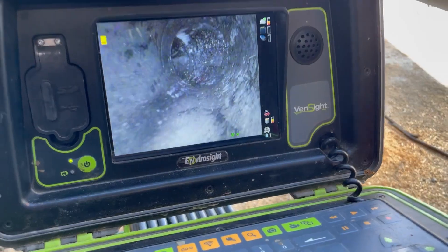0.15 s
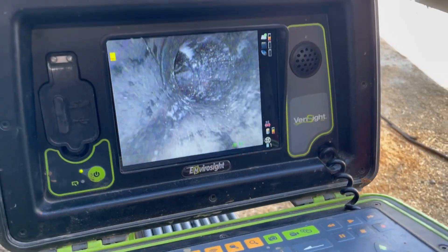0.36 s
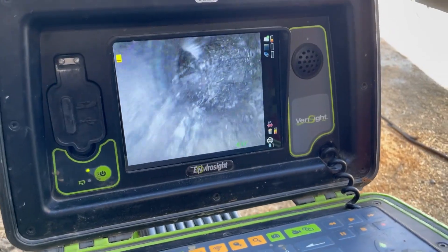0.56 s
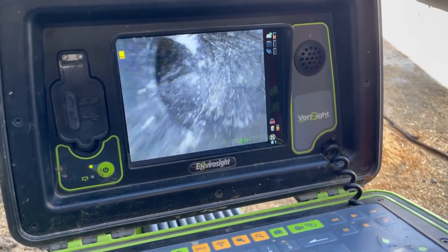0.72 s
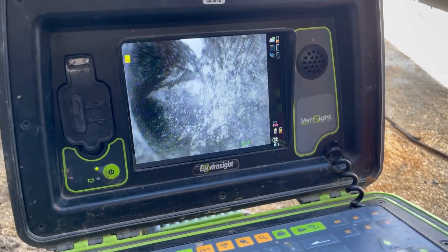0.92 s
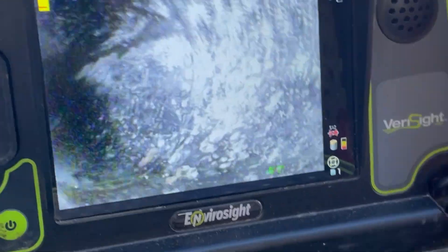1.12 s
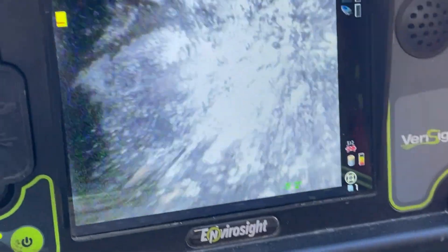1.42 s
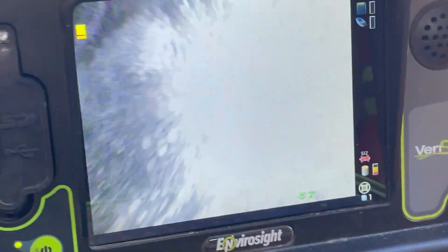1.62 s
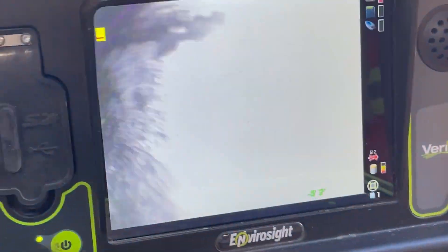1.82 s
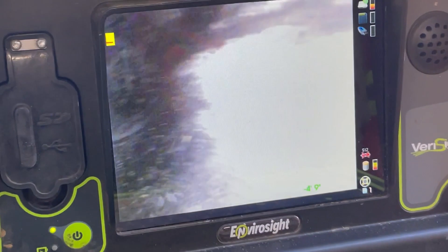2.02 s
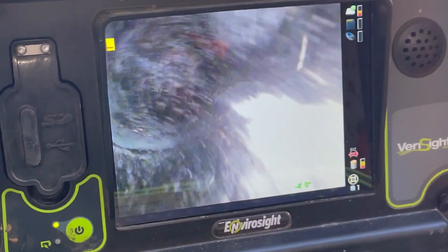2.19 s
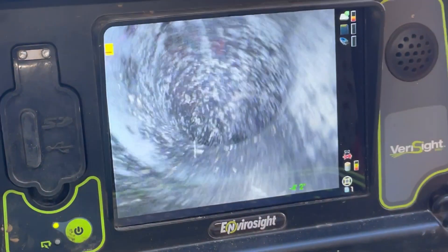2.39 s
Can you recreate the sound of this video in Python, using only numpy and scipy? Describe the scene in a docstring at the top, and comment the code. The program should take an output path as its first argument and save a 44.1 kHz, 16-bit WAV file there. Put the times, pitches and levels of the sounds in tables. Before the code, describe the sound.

A vacuum truck runs throughout, its pump buzzing in rapid pulses with a strong low hum over engine throb, airy roar and faint wavering whines. Dull thumps fall near 0.1, 0.3, 0.7, 1.3 and 1.9 seconds. Thin squeaks come early and around 1.7, short scrapes at 1.5 and 1.7. Light hiss swells near 0.9, 1.7 and the end. Outdoors, the microphone moves closer to a case after 0.7, narrowing the roar.

```python
"""Vacuum truck at work

A vacuum truck runs outdoors: its pump throbs and hums in pulses through a pipe, over the low orders of the engine.
Shaped noise makes the roar of air and a thin hiss that swells now and then; the drive whines in wavering tones.
Decaying sines make dull thumps, sagging sines thin squeaks, and resonant noise short scrapes.
The microphone moves close to an open equipment case, which colours and narrows the roar."""
import sys
import numpy as np
from scipy import signal
from scipy.fft import rfft, irfft
from scipy.io import wavfile
from scipy.ndimage import uniform_filter1d

SR = 44100
rng = np.random.default_rng(int(sys.argv[2]) if len(sys.argv) > 2 else 0)


def transcribe(u):
    """Save the signal u as a 16-bit wav file named by the first command-line argument.

    u: samples, shape (n,) or (channels, n), limited to [-1, 1]; the rate is SR.
    q: integer samples, one column per channel.
    """
    v = np.clip(np.atleast_2d(u).T, -1, 1)
    q = np.round(v * 32767).astype(np.int16)
    wavfile.write(sys.argv[1], SR, q)


N = 112454
T = np.arange(N) / SR
PUMP_HZ = 43.655  # mean strokes a second


def amp(db):
    """Decibels to gain."""
    return 10 ** (np.asarray(db) / 20)


def unit(x):
    """Scales to rms 1."""
    return x / np.sqrt(np.mean(x ** 2) + 1e-20)


def curve(points, at):
    """Reads a level curve, straight between its points."""
    return np.interp(at, *np.transpose(points))


def read(points, hz):
    """Reads a spectrum on a log-frequency axis."""
    f, value = np.transpose(points)
    return np.interp(np.log(hz + 1), np.log(f + 1), value)


def drift(rate_hz):
    """Smooth random motion of rms 1: noise with its faster changes rolled off."""
    f = np.fft.rfftfreq(2 * N, 1 / SR)
    spectrum = rfft(rng.standard_normal(2 * N))
    return unit(irfft(spectrum * np.exp(-(f / rate_hz) ** 2))[:N])


def band(x, low_hz, high_hz):
    """One frequency band of a sound, rms 1."""
    f = np.fft.rfftfreq(2 * N, 1 / SR)
    inside = (f >= low_hz) & (f < high_hz)
    return unit(irfft(rfft(x, 2 * N) * inside)[:N])


def grid(size):
    """Frame times as a column and bin frequencies as a row."""
    hop = size // 4
    t = np.arange(N // hop + 5)[:, None] * hop / SR
    return t, np.fft.rfftfreq(size, 1 / SR)


def speckle(t, hz):
    """Random short-time spectra, the raw stuff of noise."""
    z = rng.standard_normal((len(t), len(hz), 2))
    return z[..., 0] + 1j * z[..., 1]


def patches(t, hz, length_s, width_hz):
    """Random patches over time and frequency, rms 1."""
    z = rng.standard_normal((len(t), len(hz)))
    z = uniform_filter1d(z, max(1, round(length_s / t[1, 0])), 0)
    z = uniform_filter1d(z, max(1, round(width_hz / hz[1])), 1)
    return unit(z)


def sound_of(z):
    """Short-time spectra to sound; magnitude 1 gives 0 dB per Hz."""
    size = 2 * (z.shape[1] - 1)
    sound = signal.istft(z.T, nperseg=size, noverlap=size * 3 // 4)[1][:N]
    return sound * np.sqrt(1.5 * SR / size)


def pipe_ring():
    """One pressure pulse coloured by the pipe, whose higher overtones arrive later."""
    # Pipe response. Each row: multiple of the stroke rate, relative level in dB.
    pipe_response = [(1, -13), (2, -36), (3, -10.5), (4, -10), (5, -4.5), (6, -11.5), (7, 2), (8, -15.5),
                     (9, -11), (10, -19.5), (11, -19.5), (12, -13), (13, -42), (14, -25), (15, -24),
                     (16, -22), (18, -38.5)]
    spread_s_per_hz = .000028
    order, db = np.transpose(pipe_response)
    f = np.fft.rfftfreq(8192, 1 / SR)
    multiple = f / PUMP_HZ
    level = np.interp(multiple, order, db)
    level -= 4 * np.maximum(multiple - order[-1], 0)  # falls away above the last row
    level -= 30 * np.maximum(1 - multiple, 0)  # and below the stroke rate
    return np.fft.fftshift(irfft(amp(level) * np.exp(-1j * np.pi * spread_s_per_hz * f ** 2)))


def pump(turns):
    """One pressure pulse per stroke through the pipe, split into throb, main hum and overtones."""
    # Main hum. Each row: time in seconds, level in dB before hum_gain_db.
    hum_level = [(.05, -26.5), (.2, -25), (.26, -22.5), (.42, -23.2), (.55, -26), (1.1, -25.5),
                 (1.21, -24.5), (1.3, -26), (1.55, -27), (1.72, -22.5), (1.84, -25.5), (1.95, -24.5),
                 (2.08, -27), (2.37, -23), (2.52, -30)]
    # Throb below the hum. Each row: time in seconds, level in dB before throb_gain_db.
    throb_level = [(.08, -30), (.18, -25), (.33, -24.5), (.43, -27), (.54, -24.5), (.75, -32), (.92, -31.5),
                   (1.05, -29), (1.25, -26), (1.5, -35), (1.65, -25.5), (1.75, -25), (1.87, -28),
                   (2.12, -28.5), (2.25, -25.5), (2.4, -29), (2.53, -35)]
    hum_gain_db, throb_gain_db = -0.16, -0.2
    overtones_db, overtones_waver_db = -33.5, 2.5
    hum_from_hz, hum_to_hz = 283, 327
    stroke_spread_db, stroke_jitter_s = 0.48, .00008

    at = np.flatnonzero(np.diff(np.floor(turns)))
    jitter, spread = rng.standard_normal((2, len(at)))
    at = at + np.round(stroke_jitter_s * SR * jitter).astype(int)
    strokes = np.zeros(N)
    strokes[np.clip(at, 0, N - 1)] = amp(stroke_spread_db * spread)
    pulses = signal.oaconvolve(strokes, pipe_ring(), "same")

    throb = band(pulses, 0, hum_from_hz) * amp(throb_gain_db + curve(throb_level, T))
    hum = band(pulses, hum_from_hz, hum_to_hz) * amp(hum_gain_db + curve(hum_level, T))
    overtones = band(pulses, hum_to_hz, SR / 2) * amp(overtones_db + overtones_waver_db * drift(7.6))
    return (throb + hum + overtones) * amp([[.2], [-.2]])  # a touch to the left


def engine():
    """Low engine orders, the firing rate strongest, that line up in one soft beat per cycle."""
    # Engine throb. Each row: time in seconds, gain in dB on all orders.
    throb_gain = [(.05, -5), (.5, 0), (.75, .8), (.88, -1.5), (1.2, 1), (1.55, 2), (1.8, -5), (2.08, 1.2),
                  (2.3, -4.5), (2.5, 3)]
    # Engine orders. Each row: multiple of the cycle rate, level in dB before the gain above.
    orders = [(3, -41.5), (4, -31.5), (5, -36)]
    cycle_hz, wander = 14.97, 0.0012  # four-stroke cycles a second, rms share
    first_beat_s = 0.0459
    turns = np.cumsum(cycle_hz * (1 + wander * drift(2.4))) / SR - cycle_hz * first_beat_s
    tones = sum(amp(db) * np.sqrt(2) * np.cos(2 * np.pi * k * turns) for k, db in orders)
    return amp(curve(throb_gain, T)) * tones * amp([[.2], [-.2]])  # a touch to the left


def whines():
    """Faint tones of the drive that waver at random in level and phase."""
    # Whines of the drive. Each row: pitch in Hz, level in dB.
    whine_tones = [(98.6, -35.5), (145.7, -43.5), (703, -48.5), (864, -52.5), (1119, -53), (1279, -55),
                   (1438, -55.5), (2175, -71), (2799, -55), (2845, -58)]
    waver_depth, waver_hz = 0.61, 5.1
    right_lead_rad = 0.027
    out = np.zeros((2, N))
    for hz, db in whine_tones:
        waver = 1 + waver_depth * (drift(waver_hz) + 1j * drift(waver_hz))
        tone = waver * np.exp(2j * np.pi * (hz * T + rng.random()))
        right = tone * np.exp(1j * right_lead_rad)
        out += amp(db) * np.array([unit(tone.real), unit(right.real)])
    return out


def thumps():
    """Dull low bumps: sines that swell quickly and die within a few cycles."""
    # Thumps. Each row: start in seconds, pitch in Hz, peak of the envelope in dB.
    bumps = [(0.106, 116, -22.5), (0.257, 123, -19), (0.725, 133, -16), (1.315, 108, -18),
             (1.934, 116, -22.5)]
    rise_s = 0.01
    out = np.zeros(N)
    for s, hz, db in bumps:
        age = np.maximum(T - s, 0)
        u = age / rise_s
        envelope = (u * np.exp(1 - u)) ** 2
        out += amp(db) * envelope * np.sin(2 * np.pi * hz * age)
    return out


def squeaks():
    """Thin high sines, some clean and some rough with pitch flutter, each sagging a little."""
    # Squeaks. Each row: start in seconds, length in seconds, starting pitch in Hz, rms level in dB,
    # pitch flutter as a share.
    chirps = [(.074, 0.036, 7410, -53, .002), (.259, .018, 9800, -53, .002),
              (1.642, .08, 7250, -54, 0.0144), (1.655, 0.046, 6520, -51, 0.01),
              (1.7, .08, 6490, -58, 0.0051), (1.77, 0.052, 6530, -50.5, .002)]
    sag_hz_per_s, edge_s = 400, .008
    out = np.zeros(N)
    for s, length, top_hz, db, rough in chirps:
        age = T - s
        hz = (top_hz - sag_hz_per_s * age) * (1 + rough * drift(164))
        shape = np.clip(np.minimum(age, length - age) / edge_s, 0, 1)
        out += amp(db) * shape * np.sqrt(2) * np.sin(2 * np.pi * np.cumsum(hz) / SR)
    return out


def scrapes():
    """Brief friction noise ringing in a few resonances."""
    # Short scrapes. Each row: start in seconds, length in seconds, rms level at the top in dB.
    strokes = [(1.483, 0.026, -29), (1.501, 0.042, -35), (1.692, 0.022, -36)]
    # Resonances they ring with. Each row: centre in Hz, width in Hz, relative level in dB.
    modes = [(1430, 220, -7), (1880, 190, -5), (2200, 350, -17), (2580, 220, -11), (3490, 700, -30)]
    f = np.fft.rfftfreq(N, 1 / SR)
    body = sum(amp(db) / (1 + (2 * (f - hz) / width) ** 2) for hz, width, db in modes)
    grit = unit(irfft(rfft(rng.standard_normal(N)) * body, N))
    envelope = np.zeros(N)
    for s, length, db in strokes:
        progress = np.clip((T - s) / length, 0, 1)
        envelope += amp(db) * np.sin(np.pi * progress ** 0.71)  # quicker up than down
    return grit * envelope


def roar(turns):
    """Rushing air and machine noise, patchy above the bass, lightly chopped by the pump."""
    # Roar common to both channels, away from the case and close to it.
    # Each row: frequency in Hz, level in dB per Hz before roar_db.
    common_far = [(10, -34), (30, -29), (55, -2), (90, 2.5), (135, 3.5), (165, 1), (260, -0.5), (340, -3),
                  (490, -4), (580, -8.5), (780, -12), (900, -10.5), (1250, -18.5), (1650, -22), (2100, -17),
                  (2450, -20.5), (2800, -21), (3100, -27.5), (3700, -24), (5000, -31), (7000, -36.5),
                  (8500, -73), (16000, -74)]
    common_near = [(10, -34), (30, -12), (55, 2), (90, 3.5), (135, 0.5), (165, 1), (260, 3), (340, -3.5),
                   (490, -1.5), (580, -6.5), (780, -9.5), (900, -12.5), (1250, -15), (1650, -17.5),
                   (2100, -19.5), (2450, -20), (2800, -20.5), (3100, -23), (3700, -24), (5000, -30),
                   (7000, -35), (8500, -65), (16000, -67)]
    # Half the difference between the channels, away from the case and close to it.
    # Each row: frequency in Hz, level in dB per Hz before roar_db.
    wide_far = [(10, -57), (60, -16), (150, -13), (300, -6.5), (600, -9), (1000, -12), (1400, -12.5),
                (1800, -16.5), (2300, -23), (2800, -19.5), (3500, -25.5), (5300, -32), (7000, -37),
                (16000, -70)]
    wide_near = [(10, -50), (60, -29), (150, -14), (300, -10), (600, -12), (1000, -15), (1400, -23),
                 (1800, -39.5), (2300, -76), (2800, -69), (4200, -54), (5300, -34.5), (7000, -57),
                 (16000, -73)]
    # Share of the difference that makes the left louder. Each row: frequency in Hz, share from -1 to 1.
    left_louder = [(380, -0.017), (540, 0.19), (610, 0.031), (1500, -0.065), (1900, 0.27), (2500, -0.025),
                   (3500, -0.29), (5400, -.26), (7000, -0.24)]
    # Share of the difference that makes the left earlier. Each row: frequency in Hz, share from -1 to 1.
    left_earlier = [(150, 0.2), (400, 0.74), (520, .35), (610, -.45), (880, -.7), (1300, -.48), (1650, 0.5),
                    (1950, 0.7), (2800, -.25), (5200, -0.6), (7000, -.2)]
    # Microphone move. Each row: time in seconds, closeness to the case from 0 to 1.
    closeness = [(0, 0.1), (.7, 0), (1.15, 0.56), (2.55, 0.96)]
    roar_db, patch_db, swell_db, flicker_db = -52, 1.2, 0.62, 0.66
    patchy_above_hz = 500  # the bass stays even
    chop_depth, chop_above_hz = 0.018, 1300

    t, hz = grid(size=2048)
    close = curve(closeness, t)
    uneven = patch_db * patches(t, hz, .06, 260)
    uneven = uneven + swell_db * np.interp(t, T, drift(5.1))
    uneven = uneven + flicker_db * patches(t, hz, .035, 3500)  # quick, across wide bands
    life = roar_db + uneven * hz ** 2 / (hz ** 2 + patchy_above_hz ** 2)

    # The difference partly follows the common roar: in step for louder, a quarter turn ahead for earlier.
    common = speckle(t, hz)
    lean = read(left_louder, hz) + 1j * read(left_earlier, hz)
    wide = lean * common + np.sqrt(np.clip(1 - abs(lean) ** 2, 0, 1)) * speckle(t, hz)

    mid_level = (1 - close) * read(common_far, hz) + close * read(common_near, hz)
    side_level = (1 - close) * read(wide_far, hz) + close * read(wide_near, hz)
    mid = sound_of(common * amp(life + mid_level))
    side = sound_of(wide * amp(life + side_level))
    air = np.array([mid + side, mid - side])
    high_pass = signal.butter(1, chop_above_hz, "high", fs=SR, output="sos")
    upper = signal.sosfilt(high_pass, air)
    return air + chop_depth * np.cos(2 * np.pi * turns) * upper


def hiss():
    """Thin noise from one side that swells now and then and reaches the two ports at different times."""
    # Steady hiss. Each row: frequency in Hz, level in dB per Hz before hiss_db.
    hiss_spectrum = [(20, -50), (4500, -39), (6500, -6), (7800, 3.5), (8800, -0.5), (10000, -3),
                     (12000, -6.5), (13500, -11.5), (15500, -20), (17000, -22)]
    # Swells. Each row: centre in seconds, half length in seconds, rise in dB, centre in Hz, half width in Hz.
    hiss_swells = [(.28, 0.044, 5, 10100, 1500), (0.82, 0.078, 9, 13000, 4770),
                   (0.947, 0.088, 10.5, 13200, 4770), (1.28, .025, 6, 10200, 2500),
                   (1.683, 0.083, 12.5, 6900, 900), (1.663, 0.052, 4, 10700, 2000),
                   (2.284, 0.026, 2, 10600, 3000), (2.54, 0.11, 11.5, 12200, 4800)]
    hiss_db, flicker_db = -86, 1.5
    in_phase_hz, port_delay_s = 10940, 0.0002  # the right port hears it later
    t, hz = grid(size=512)
    level = hiss_db + read(hiss_spectrum, hz) + flicker_db * patches(t, hz, 0.018, 1400)
    for s, length, db, centre_hz, width_hz in hiss_swells:
        level = level + db * np.exp(-((t - s) / length) ** 2 - ((hz - centre_hz) / width_hz) ** 2)
    left = speckle(t, hz) * amp(level)
    right = left * np.exp(-2j * np.pi * (hz - in_phase_hz) * port_delay_s)
    return np.array([sound_of(left), sound_of(right)])


def scene():
    """The truck and the small sounds around it; the pump's wandering strokes also chop the roar."""
    wander = .001  # rms share of the stroke rate
    turns = np.cumsum(PUMP_HZ * (1 + wander * drift(2.18))) / SR + 0.1999
    truck = pump(turns) + engine() + whines()
    small_sounds = thumps() + squeaks() + scrapes()
    return truck + small_sounds + roar(turns) + hiss()


def record(dry):
    """The recorder's band limit: a steep low-pass."""
    edge_hz = 15800
    low_pass = signal.firwin(511, edge_hz, window=("kaiser", 9), fs=SR)
    return signal.oaconvolve(dry, low_pass[None], "same")


dry = scene()
out = record(dry)
transcribe(out)
```